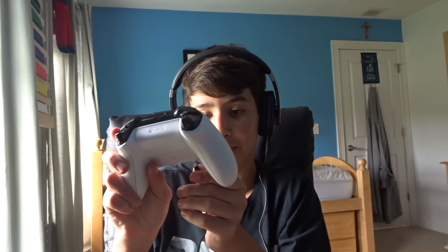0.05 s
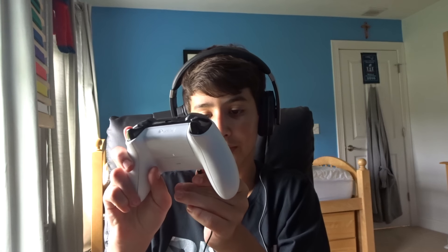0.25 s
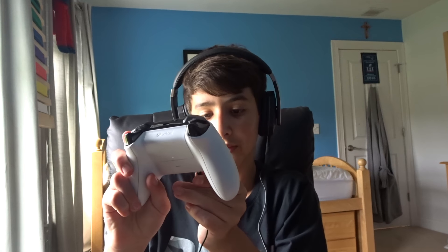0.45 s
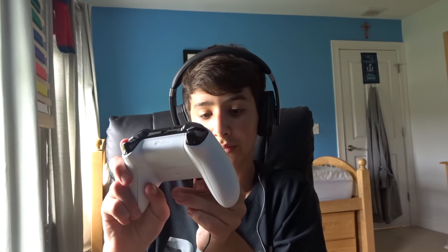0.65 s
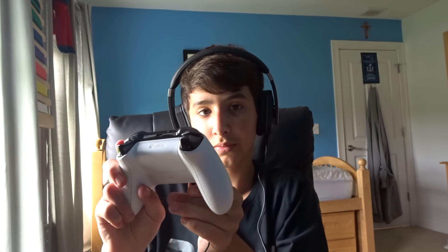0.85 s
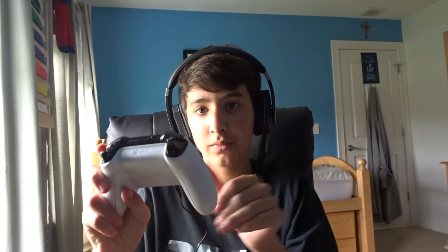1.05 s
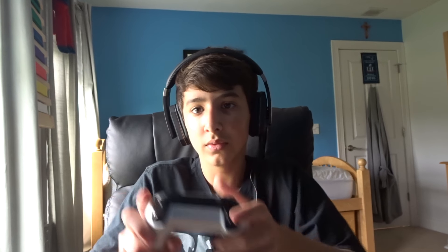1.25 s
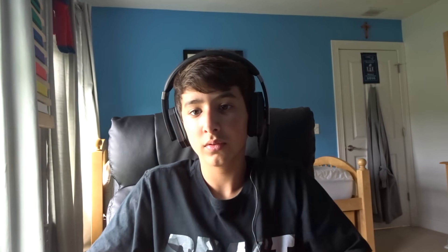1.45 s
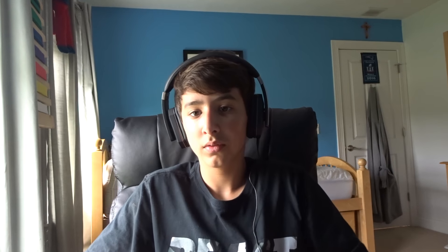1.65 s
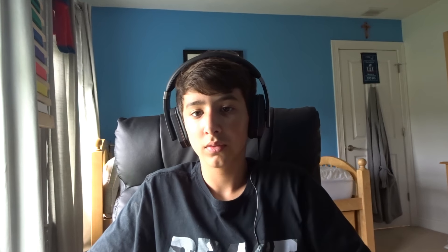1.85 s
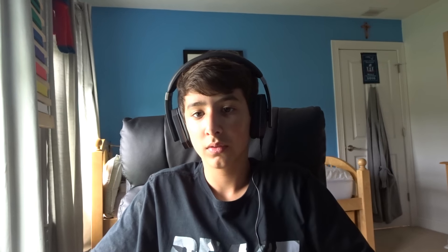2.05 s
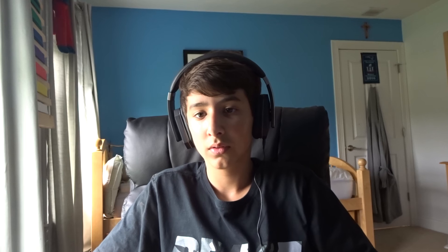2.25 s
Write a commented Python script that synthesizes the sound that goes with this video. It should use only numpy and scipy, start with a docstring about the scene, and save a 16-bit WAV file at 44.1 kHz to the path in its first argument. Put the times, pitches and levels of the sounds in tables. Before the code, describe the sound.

Light, hard plastic clicks of a game controller, close in stereo in a small bedroom with faint hiss. A chattering snap builds at 0.23-0.28 s; another click lands at 0.58 with small ticks after. Soft rustle and finger taps come around 0.75-1.05, a short scrape at 1.21, a barely audible squeak at 1.41, the loudest clack at 1.58 amid sleeve rustle, a tight click cluster at 1.97, and faint taps near 2.06.

```python
"""A faint hiss fills a small bedroom; then a cable plug scrapes in and snaps home on a plastic game controller.
Close to the two-port microphone, shell and buttons click: damped modes under cracks and buzz.
Sleeves rustle and skin slips as coloured noise, fingers tick as softer contacts, and one fingertip
squeaks as a rough gliding tone as it is lowered. A short diffuse tail brings the walls' answer."""
import sys
import numpy as np
from scipy import signal
from scipy.fft import rfft, irfft, next_fast_len
from scipy.io import wavfile
from scipy.ndimage import map_coordinates

SR = 44100
rng = np.random.default_rng(int(sys.argv[2]) if len(sys.argv) > 2 else 0)


def file_out(sig):
    """Save sig as 16-bit WAV at sys.argv[1]."""
    # one column per channel
    cols = np.atleast_2d(sig).T
    # limit, then scale
    lim = np.clip(cols, -1, 1)
    pcm = np.round(lim * 32767).astype(np.int16)
    wavfile.write(sys.argv[1], SR, pcm)


N = 99225
TIME = np.arange(N) / SR  # seconds

# Likeness of the two ports for the close sounds and the hiss.
# Each row: frequency in Hz, left-right correlation from 0 to 1.
PORT_LIKENESS = [(60, 1), (300, 0.74), (900, 0.41), (2500, 0.43), (5000, 0.067), (10000, .15)]
SLIP_ROOM_DB = -5.5  # room tail against the direct sound, for scrapes and squeak


def amp(db):
    """Decibels to gain."""
    return 10 ** (np.asarray(db) / 20)


def unit(x):
    """Scale to rms 1."""
    return x / np.sqrt(np.mean(x ** 2) + 1e-20)


def along(points, hz):
    """Read (Hz, value) points along a logarithmic frequency axis."""
    point_hz, value = np.transpose(points)
    return np.interp(np.log(hz + 1), np.log(point_hz + 1), value)


def filtered(x, response):
    """Shape x by a zero-phase frequency response."""
    size = x.shape[-1]
    padded = next_fast_len(size + 4096)  # room for the filter's ringing
    spectrum = rfft(x, padded) * response(np.fft.rfftfreq(padded, 1 / SR))
    return irfft(spectrum, padded)[..., :size]


def wobble(rate):
    """A smooth random curve with rate knots a second, for flutter and roughness."""
    knots = rng.standard_normal(N // 8)
    return map_coordinates(knots, [TIME * rate], mode="wrap")


def noise(spectrum, likeness, size):
    """Coloured stereo noise of rms 1; the mid-side balance sets how alike the ports are."""
    def mid_and_side(hz):
        turn = np.arccos(np.clip(along(likeness, hz), -1, 1)) / 2
        return amp(along(spectrum, hz)) * [np.cos(turn), np.sin(turn)]

    mid, side = filtered(rng.standard_normal((2, size)), mid_and_side)
    return unit(np.array([mid + side, mid - side]))


def add(out, start_s, x):
    """Mix x into out at a time in seconds."""
    i = int(round(start_s * SR))
    out[:, i:i + x.shape[1]] += x[:, :N - i]


def in_room(x, room_db):
    """The close sound plus a decaying diffuse tail that swells when the nearest walls answer."""
    # Colour of the tail. Each row: frequency in Hz, level in dB.
    room_colour = [(400, 0), (900, 1.5), (1300, 3.5), (2000, 0), (3000, -3), (4300, 3), (6500, -1.5),
                   (11000, 0)]
    # Likeness of the tail at the two ports. Each row: frequency in Hz, left-right correlation.
    room_likeness = [(500, 0.83), (2000, 0.8), (3500, 0.55), (6000, .1)]
    # Decay of the room. Each row: frequency in Hz, time to fall 60 dB in seconds.
    room_t60 = [(500, 0.44), (1300, 0.29), (3500, 0.31), (9000, 0.34)]
    onset_s, wall_s, wall_fade_s, wall_gain = 0.002, 0.0155, 0.0071, 1.11

    steady = noise(room_colour, room_likeness, size=SR // 2)
    hz, t, bands = signal.stft(steady, SR, nperseg=256)
    decay = amp(-60 * t / along(room_t60, hz)[:, None])
    tail = signal.istft(bands * decay, SR, nperseg=256)[1]

    t = np.arange(tail.shape[1]) / SR
    onset = np.clip(t / onset_s, 0, 1) ** 2
    walls = 1 + wall_gain * (t > wall_s) * np.exp(-abs(t - wall_s) / wall_fade_s)
    tail = tail * onset * walls
    direct = t == 0
    response = amp(room_db) * tail / np.linalg.norm(tail[0]) + direct
    return signal.fftconvolve(x, response, axes=1)


def hiss():
    """A faint steady hiss in the room, as coloured noise."""
    # Each row: frequency in Hz, relative level in dB.
    hiss_colour = [(25, -27), (60, -31), (130, -26.5), (250, -21), (420, -14.5), (650, -2), (850, -5.5),
                   (1200, -5), (1900, -4), (3000, -8.5), (4500, -6.5), (7000, -14), (11000, -20),
                   (14000, -57)]
    return amp(-63.5) * noise(hiss_colour, PORT_LIKENESS, size=N)


def ring(modes, t, rise_s, line_hz=0):
    """Damped modes, each reaching the two ports a little out of step; line_hz blurs their pitch."""
    # How far out of step. Each row: frequency in Hz, phase scatter in radians, opposite at the ports.
    port_scatter = [(800, .15), (2200, 0.13), (3200, 0.18), (5000, 1), (10000, 1)]
    hz, db, t60 = np.transpose(modes)[:, :, None]
    level_scatter, skew = rng.standard_normal((2, len(modes), 1))
    skew = skew * along(port_scatter, hz) * np.array([1, -1])[:, None, None]
    sign = (-1) ** np.arange(len(modes))[:, None]
    drift = 0
    if line_hz:
        # A random walk of phase widens each mode into a line.
        steps = rng.standard_normal((len(modes), len(t)))
        drift = np.cumsum(steps, axis=1) * np.sqrt(2 * np.pi * line_hz / SR)
    level = amp(db + 0.5 * level_scatter - 60 * t / t60)
    waves = sign * level * np.sin(2 * np.pi * hz * t + skew + drift)
    return waves.sum(1) * (1 - np.exp(-t / rise_s))


def contact(pitch_hz, emphasis_db, crack_db, hollow_hz, knock_db, ring_db):
    """One plastic contact: ringing shell, hollow and springs under bursts of crack, buzz and thud."""
    # Modes of the shell. Each row: frequency in Hz, level in dB, time to fall 60 dB in seconds.
    shell_modes = [(1384, -24, 0.025), (1637, -4, 0.0091), (1910, -4, 0.018), (2200, -6.5, 0.016),
                   (2530, -5.5, 0.012), (2850, -4.5, 0.017), (3036, -2.5, 0.013), (3400, -10, 0.018),
                   (3800, -11, 0.021), (4190, -5, 0.01), (4580, -6.5, 0.012), (5020, -15, 0.019),
                   (6250, -8, 0.0089), (7270, -41, 0.01)]
    # The hollow between case and hands, tuned by the grip.
    # Each row: ratio to the hollow's pitch, level in dB, time to fall 60 dB in seconds.
    hollow_modes = [(0.822, -22.5, 0.029), (1.001, -12.5, .036), (1.15, -23, 0.026)]
    # Small loose parts, such as springs, that ring on.
    # Each row: frequency in Hz, level in dB, time to fall 60 dB in seconds.
    spring_modes = [(1942, -29, 0.18), (2776, -17.5, 0.092), (2945, -32, .15), (3650, -23, 0.33),
                    (3690, -42, 0.16), (3950, -27, 0.24), (4100, -28, 0.33), (4680, -26.5, 0.27),
                    (4960, -32, .18), (5400, -30.5, 0.13), (6330, -44, .25)]
    # Colour of the crack. Each row: frequency in Hz, relative level in dB.
    crack_colour = [(300, -31), (700, -17.5), (1500, -19.5), (3000, -1.5), (5000, 2), (7500, 2.5),
                    (10500, -8.5), (13000, -48)]
    # Dense, heavily damped buzz of the plastic parts. Each row: frequency in Hz, relative level in dB.
    buzz_colour = [(400, -57), (750, -15.5), (1050, 8), (1300, 2.5), (1900, -5), (3000, 7.5), (4500, -2.5),
                   (5600, 1), (8000, -28.5), (11000, -27)]
    # Faint push of the whole case. Each row: frequency in Hz, relative level in dB.
    thud_colour = [(30, 3.5), (150, 3), (350, 9), (600, -0.5), (1200, -11)]
    mode_rise_s, hollow_rise_s = 0.00031, 0.0019
    spring_line_hz = 39.7  # loose parts chatter as they ring
    low_cut_hz = 660

    t = np.arange(SR // 6) / SR

    def burst(colour, db, t60):
        return noise(colour, PORT_LIKENESS, size=len(t)) * amp(db - 60 * t / t60)

    def emphasis(hz):
        """Lift in dB around the pitch favoured by where the shell is struck."""
        return emphasis_db * np.exp(-(np.log2(hz / pitch_hz) / 0.54) ** 2)

    shell = [(hz, db + emphasis(hz), t60) for hz, db, t60 in shell_modes]
    hollow = [(ratio * hollow_hz, db + knock_db, t60) for ratio, db, t60 in hollow_modes]
    body = ring(shell, t, mode_rise_s) + ring(hollow, t, hollow_rise_s)
    springs = amp(ring_db) * ring(spring_modes, t, mode_rise_s, spring_line_hz)
    crack = burst(crack_colour, -4 + crack_db, 0.017)
    buzz = burst(buzz_colour, -6, 0.025)
    high_pass = signal.butter(6, low_cut_hz, "high", fs=SR, output="sos")
    thud = burst(thud_colour, -50.5, 0.12)  # stays below the high-pass
    return signal.sosfilt(high_pass, body + springs + crack + buzz) + thud


def clicks():
    """The plug and the buttons snap and chatter against the shell as sharp contacts."""
    # Each row: start in seconds, level in dB, favoured pitch in Hz, emphasis in dB, crack in dB,
    # hollow pitch in Hz, hollow knock in dB, spring ring in dB, room in dB, left over right in dB.
    click_rows = [ (0.2332, -30, 2660, 4, -13, 847, -6.5, -22, 0, -1.5),
                  (0.2449, -34.5, 2900, -2, -25, 850, 0, -6, -5, 6),
                  (.2570, -36.5, 2200, 6, -10, 756, 8, -12, -30, -3),
                  (0.2618, -33, 2530, -6.5, -19, 770, -1, -6, 3, -4),
                  (0.2711, -27, 3500, 4, -5, 910, -0.5, 4, 1.5, 4.5),
                  (0.2771, -21, 3400, 8.5, -4.5, 997, -16, 5, -1, -1),
                  (0.5841, -24, 2080, 8.5, 5.5, 912, 1, -11, -0.5, 0.5),
                  (0.6043, -35.5, 2500, 3, 8, 850, -4, -31, -2, 2),
                  (0.6156, -35.5, 2200, 9.5, 6.5, 874, -8, -7, 4, -2.5),
                  (0.635, -37.5, 1820, 2.5, -13, 860, -3, -12, 6, -1),
                  (1.5776, -17.5, 2850, 8.5, -5, 907, 0, -4, -6.5, 2),
                  (1.5868, -28.5, 3040, 5, -4, 920, -17, -15, -0.5, -1.5),
                  (1.9734, -24.5, 2400, 5.5, -2, 980, -5, -22, -3, 1),
                  (1.9776, -31.5, 2240, 11, -14, 964, -5, -13, -14, 1),
                  (1.98, -38, 3800, 13.5, -6, 970, 6, -6, -4, 6.5),
                  (1.9825, -37, 3430, 14, -5, 950, 3, -19, -0.5, -7.5)]
    out = np.zeros((2, N))
    for row in click_rows:
        start_s, db, pitch_hz, emphasis_db, crack_db, hollow_hz, knock_db, ring_db, room_db, pan_db = row
        close = contact(pitch_hz, emphasis_db, crack_db, hollow_hz, knock_db, ring_db)
        port_db = db + np.array([[pan_db], [-pan_db]]) / 2
        add(out, start_s, in_room(close, room_db) * amp(port_db))
    return out


def rustle():
    """Sleeves and hands brush as the controller is lowered: fluttering coloured noise."""
    # Each row: time in seconds, level in dB; silent outside these times.
    brush_level = [(.72, -68.5), (.82, -62.5), (.9, -64), (.97, -70.5), (1.07, -68), (1.14, -68.5),
                   (1.21, -60), (1.35, -57), (1.44, -57), (1.55, -53), (1.72, -56.5), (1.82, -65.5),
                   (1.95, -73.5)]
    # Each row: frequency in Hz, relative level in dB.
    brush_colour = [(200, -30), (500, -14.5), (850, -3.5), (1200, -8), (2000, 1.5), (3200, 0.5),
                    (4500, -3.5), (6500, -5.5), (11000, -13.5)]
    level_db = np.interp(TIME, *np.transpose(brush_level), left=-np.inf, right=-np.inf)
    flutter_db = 3.1 * wobble(70)
    brush = amp(level_db + flutter_db) * noise(brush_colour, PORT_LIKENESS, size=N)
    return in_room(brush, -5.5)[:, :N]


def scrapes():
    """Short slips of skin and cable over the plastic: noise with a grainy level."""
    # Each row: start in seconds, length in seconds before the fall, level in dB.
    slips = [(0.844, 0.012, -58.5), (0.883, 0.017, -64), (1.2134, .021, -38.5), (1.274, 0.033, -50),
             (1.398, 0.027, -53)]
    # Each row: frequency in Hz, relative level in dB.
    slip_colour = [(300, -56), (600, -18.5), (860, -3), (1150, -10), (1900, -4), (2950, 3.5), (3500, -0.5),
                   (4300, 1), (5500, -7), (8000, -9.5), (11000, -18)]
    rise_s, fall_s, grain_db, grain_rate = 0.0039, 0.0068, 1, 300  # grain_rate in knots a second
    stroke = 0
    for start_s, length_s, db in slips:
        rise = np.clip((TIME - start_s) / rise_s, 0, 1)
        fall = np.exp(-np.maximum(TIME - start_s - length_s, 0) / fall_s)
        stroke = stroke + amp(db) * rise * fall
    grain = unit(noise(slip_colour, PORT_LIKENESS, size=N) * amp(grain_db * wobble(grain_rate)))
    return in_room(stroke * grain, SLIP_ROOM_DB)[:, :N]


def taps():
    """Fingers shift their grip and tick on the case as soft contacts."""
    # Each row: start in seconds, level in dB, crack in dB, hollow pitch in Hz, hollow knock in dB.
    tap_rows = [(0.931, -50, -13, 845, 6), (.989, -53.5, -0.5, 810, 16.5), (1.002, -52, -12, 810, 6),
                (1.022, -43.5, -10, 813, 16.5), (1.046, -42, -20, 910, -1), (1.219, -42, -5, 900, 1),
                (1.232, -49.5, -3, 845, -9), (1.653, -40, -10, 890, -2), (1.661, -47, -16, 955, 18.5),
                (2.055, -39, -14, 1026, 8), (2.063, -41.5, -11, 875, 7.5), (2.073, -46.5, 0, 978, 17)]
    pitch_hz, emphasis_db, ring_db, room_db = 2400, 3.5, -12, -5
    out = np.zeros((2, N))
    for start_s, db, crack_db, hollow_hz, knock_db in tap_rows:
        close = contact(pitch_hz, emphasis_db, crack_db, hollow_hz, knock_db, ring_db)
        add(out, start_s, amp(db) * in_room(close, room_db))
    return out


def squeak():
    """A faint rough tone that wavers and rises as a fingertip slides on the case."""
    # One row: start in seconds, length in seconds, first pitch in Hz, last pitch in Hz, level in dB.
    start_s, length_s, first_hz, last_hz, db = (1.413, .052, 800, 920, -55)
    waver_hz, rough_db, fade_db = 35, 3, 6
    progress = np.clip((TIME - start_s) / length_s, 0, 1)
    hz = first_hz + (last_hz - first_hz) * progress + waver_hz * wobble(300)
    edges = np.minimum(1, 10 * np.minimum(progress, 1 - progress))
    level = edges * amp(db - fade_db * progress + rough_db * wobble(240))
    tone = np.sqrt(2) * level * np.sin(2 * np.pi * np.cumsum(hz) / SR)
    return in_room(np.array([tone, tone]), SLIP_ROOM_DB)[:, :N]


def scene():
    """All handling sounds over the room's hiss."""
    return hiss() + clicks() + rustle() + scrapes() + taps() + squeak()


def record(dry):
    """The recorder cuts steeply above its band limit."""
    top_hz = 11100
    return filtered(dry, lambda hz: 1 / np.sqrt(1 + (hz / top_hz) ** 200))


dry = scene()
out = record(dry)
file_out(out)
```